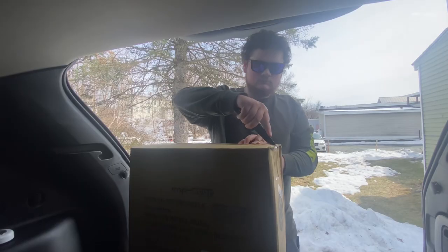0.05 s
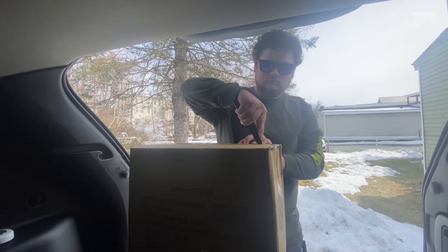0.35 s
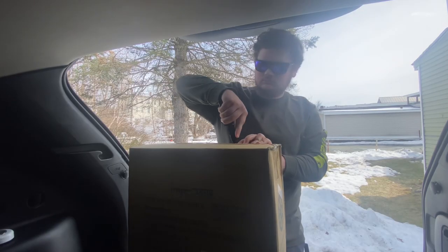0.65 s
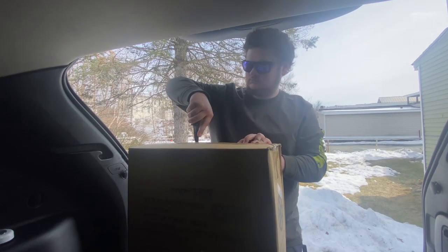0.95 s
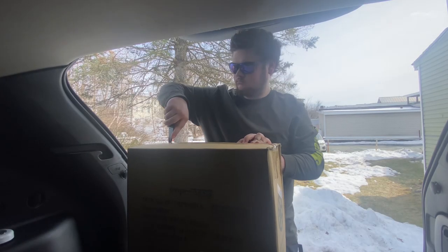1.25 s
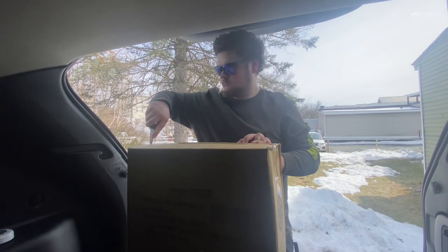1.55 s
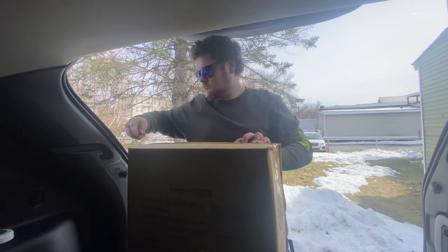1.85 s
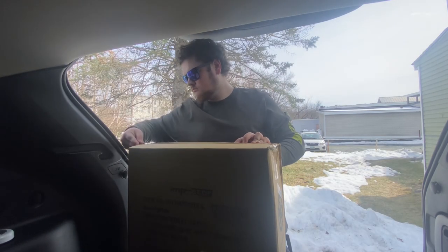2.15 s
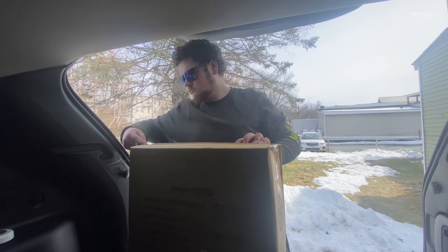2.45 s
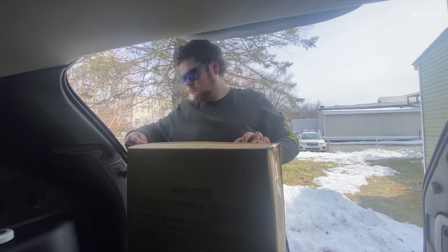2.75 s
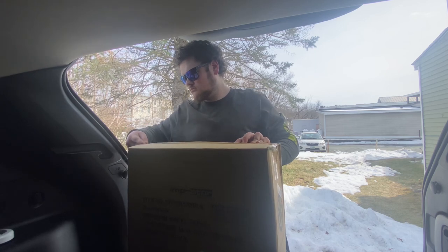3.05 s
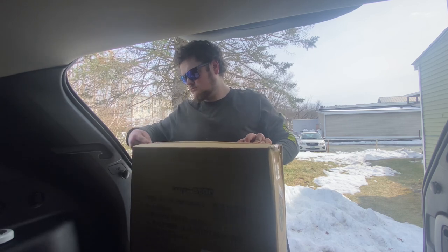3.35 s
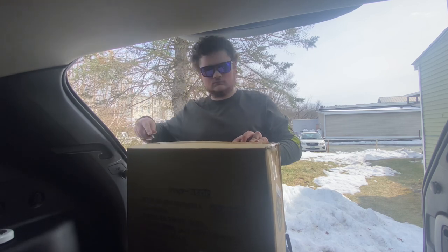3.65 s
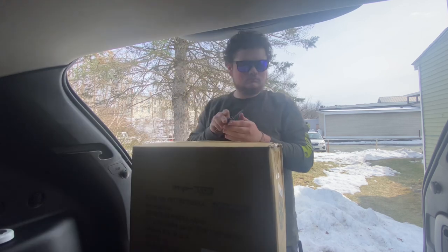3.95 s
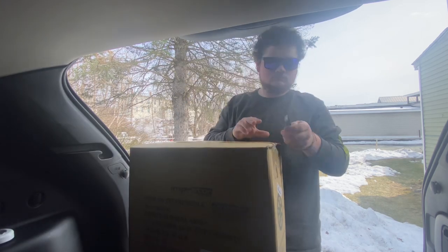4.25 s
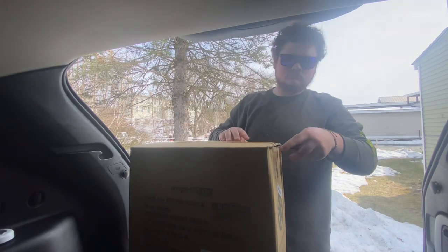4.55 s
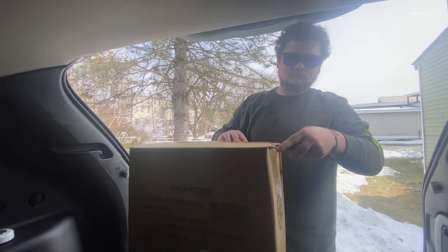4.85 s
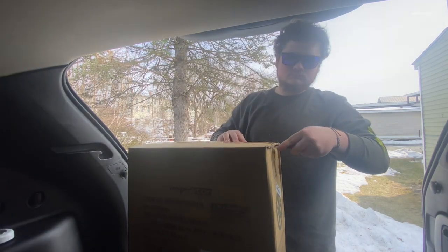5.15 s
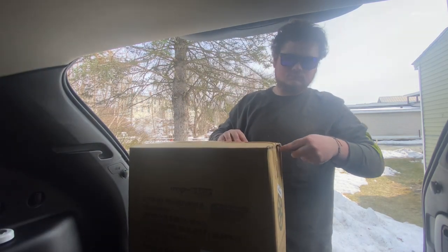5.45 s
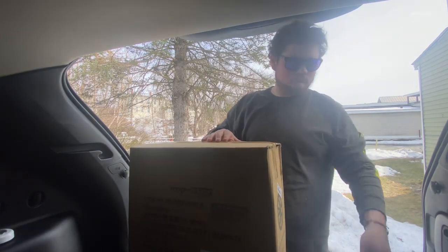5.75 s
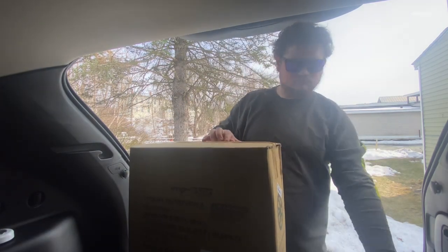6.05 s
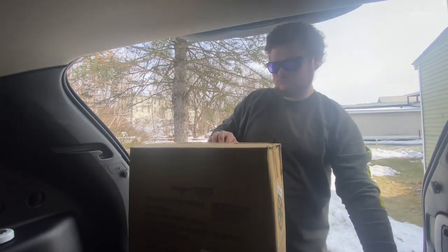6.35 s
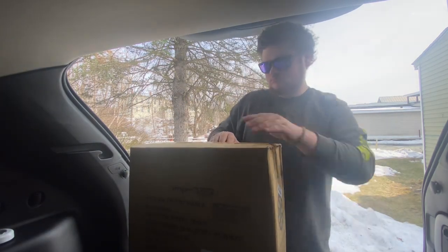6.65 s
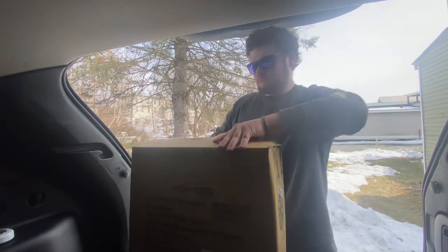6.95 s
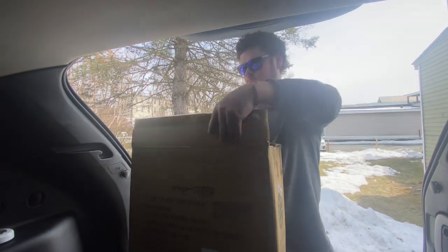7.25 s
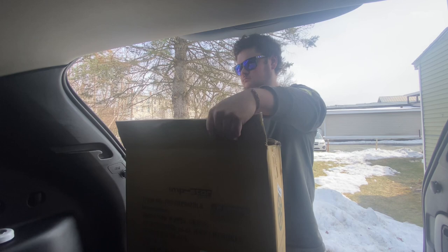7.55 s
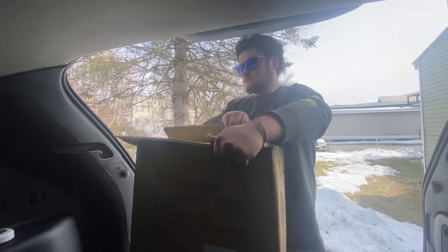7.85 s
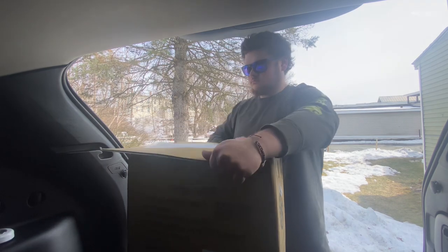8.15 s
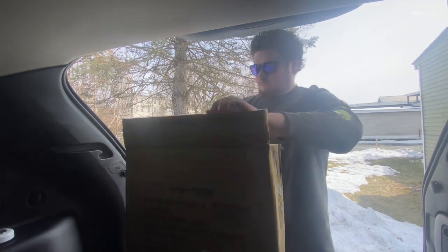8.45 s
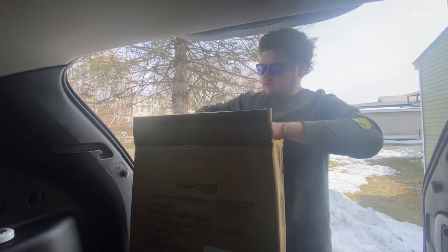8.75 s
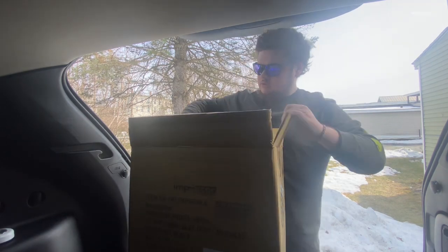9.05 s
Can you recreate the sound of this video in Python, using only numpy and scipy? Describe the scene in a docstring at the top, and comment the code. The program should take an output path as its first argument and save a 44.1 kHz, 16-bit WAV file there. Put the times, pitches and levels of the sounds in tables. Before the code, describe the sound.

A blade rasps through the tape of a large cardboard box in one long cut, then picks at it in short strokes. The seams pop one by one with papery cracks and hollow thumps. The flaps are pulled up, rubbing against each other, and one catches and judders. It is heard from inside a car's open boot, with a low outdoor rumble throughout and a faint distant whistle twice.

```python
"""A big cardboard box is opened at a car's tailgate, heard from inside the boot.
First a blade rasps through the top tape; then short strokes pick at it and the seams pop one by one.
From about 6.7 s the flaps are pulled up, rubbing on each other, and near 8 s one catches and judders.
Contacts crackle in the paper skin, knock in the stiff board and thump in the wide panels.
Outdoors rumbles low throughout, and twice a faint whistle carries from far off."""
import sys
import numpy as np
from scipy import signal
from scipy.fft import rfft, irfft, next_fast_len
from scipy.io import wavfile

SR = 44100
rng = np.random.default_rng(int(sys.argv[2]) if len(sys.argv) > 2 else 0)


def wav_record(signal):
    """Record a signal, one row per channel, as 16-bit PCM in the file named by sys.argv[1]."""
    frames = np.transpose(np.atleast_2d(signal))
    bounded = np.clip(frames, -1, 1)
    # unit amplitude maps onto the largest positive 16-bit level
    quanta = np.round(bounded * 32767).astype(np.int16)
    wavfile.write(sys.argv[1], SR, quanta)


N = 409688
TIME = np.arange(N) / SR
AGE = np.arange(SR // 3) / SR  # time axis of one hit
LEAD_S, TOUCH_S = .015, .025  # strain before a snap; fade as a contact lands or lifts

# the wide panels and the air inside the box: f/Hz, level/dB, t60/s
PANEL_MODES = [(66.9, 1.5, 0.38), (85, -2.5, 0.22), (117.7, -2.5, 0.12), (150.4, -6, 0.12), (202.2, 1, 0.1),
               (233.5, 0, 0.093), (316, -9.5, 0.025)]
# the stiff board: f/Hz, level/dB, t60/s
BOARD_MODES = [(328, -4, 0.022), (385.3, 4, 0.07), (430, -3, 0.025), (491, -2.5, 0.049), (617, -4.5, 0.054),
               (727, 0, 0.014), (870, 2, 0.019), (957, 2.5, 0.062), (1155, -1, 0.029), (1270, -17.5, 0.012),
               (1510, -6, 0.0083)]
# the steel blade: f/Hz, level/dB, t60/s
BLADE_MODES = [(2860, 2, 0.041), (3080, 0, 0.047), (3590, -9, 0.064), (5640, 11, 0.027)]


def seam_pops():
    """A seam bursts with a sharp blow and a twang of taut tape; the rest tears a moment later."""
    # t/s, crumble/s, crack/dB, crack tilt/(dB/octave), twang/dB, knock/dB, knock f/Hz, width/octaves,
    # ring over knock/dB, thump/dB, thump f/Hz, tear delay/s, tear over burst/dB
    bursts = [(0.299, 0.0025, -29.5, 6.5, -43, -25.5, 407, 0.81, -14, -24, 96, 0.022, -10),
              (2.359, 0.015, -31.5, 9.5, -37, -28, 340, 1, 1.5, -23.5, 205, 0.017, -3.5),
              (3.3825, 0.009, -34.5, 6.5, -38.5, -27, 825, 0.29, 1, -16, 223, 0.033, -3.5),
              (4.9331, 0.0077, -40.5, 5, -62, -37, 760, 0.47, -3, -24, 203, 0.029, -12),
              (5.093, 0.007, -27, 3.5, -42, -27, 400, 1, 1.5, -20.5, 155, 0.026, -16),
              (5.2348, 0.0067, -27, 2, -47, -33.5, 910, .7, -3, -24.5, 150, 0.016, -8),
              (6.431, 0.0057, -26, -0.5, -25.5, -28, 372, 0.87, 1.5, -24.5, 135, 0.0058, -20),
              (6.952, 0.0036, -25.5, 5, -31.5, -19.5, 576, 0.41, -1, -17, 166, 0.008, -16),
              (7.555, 0.012, -38, -3, -54, -35.5, 595, 0.64, 0, -33, 134.1, 0.027, -7),
              (8.476, 0.005, -38, 5, -43.5, -35, 760, 0.83, -4, -30.5, 96.1, 0.0065, -33)]
    # taut tape: f/Hz, level/dB, t60/s
    tape_modes = [(2470, -4, 0.021), (2766, 1.5, 0.033), (3550, -1.5, 0.017), (4770, -2, 0.017)]
    out = np.zeros((2, N))
    for (s, crumble_s, crack, tilt, twang, knock, knock_hz, octaves,
         ring, thump, thump_hz, delay_s, tear_db) in bursts:
        burst = blow(crumble_s, crack, tilt, knock, knock_hz, octaves, ring, thump, thump_hz)
        tape = ringing(flexed(tape_modes, spread=0.01))
        burst += cabin(strike(crumble(crumble_s, snap=0.75), tape, twang))
        tear = blow(crumble_s=0.0096, crack_db=crack + tear_db, tilt_db=0.7,
                    knock_db=knock + tear_db - 4, knock_hz=knock_hz, octaves=octaves, ring_db=ring,
                    thump_db=thump + tear_db, thump_hz=102)
        add(out, s - LEAD_S, burst)
        add(out, s + delay_s - LEAD_S, tear)
    return out


def tape_cutting():
    """The blade rasps through the top tape in one long cut; blade and hand also work it in strokes."""
    # paper skin under the tape: f/Hz, level/dB
    colour = [(1500, -5), (2000, 1), (2800, 5), (3600, -2), (5200, 6), (6500, 2.5), (8500, 0),
              (11000, -3.5), (13000, -6), (15500, -25)]
    # the long cut: t/s, rasp/dB, weight on the panels/dB, tilt/(dB/octave)
    long_cut = [(0.385, -54.5, 8, -6.5), (0.46, -53, 7.5, -5.5), (0.52, -56.5, 9, 1), (0.6, -56, 15, -2.5),
                (0.69, -53.5, 10, -3), (0.77, -52.5, 10, 7.5), (0.82, -51, 13.5, 5), (0.9, -53, 7, 4),
                (0.95, -47, 3, 0), (1.06, -53.5, 11, -3), (1.14, -54, 17, 0.5), (1.22, -52, 10, 6),
                (1.31, -50, 12, -2), (1.37, -54.5, 12.5, -2.5), (1.49, -47.5, 3, -0.5), (1.6, -54, 6, -3.5),
                (1.67, -48.5, 8, -5)]
    # short strokes: start/s, fullest/s, end/s, rasp/dB, weight/dB, tilt/(dB/octave)
    picks = [(0.27, 0.32, 0.39, -47, 11.5, -1.5), (1.68, 1.8, 2.1, -62, 8, -4),
             (2.16, 2.19, 2.23, -56, 17, -8), (2.24, 2.3, 2.44, -46, 11, -9.5),
             (2.355, 2.385, 2.44, -39.5, -3, 4.5), (2.43, 2.53, 2.71, -49.5, 8.5, -1),
             (2.66, 2.71, 2.93, -58.5, 10.5, -0.5), (3.3, 3.38, 3.56, -41.5, 10, -0.5),
             (3.68, 3.74, 3.83, -48.5, 0, 0), (3.8, 3.88, 3.99, -53.5, -25, 3.5),
             (4.19, 4.225, 4.275, -51, -12, 4), (4.85, 5.0, 5.1, -55, 17, -2.5),
             (4.915, 4.95, 5.0, -44.5, 17.5, 3), (5.04, 5.2, 5.39, -39, 9.5, 1.5),
             (5.46, 5.48, 5.55, -48, 5.5, 0), (5.58, 5.67, 5.74, -48, -16, 1), (5.7, 6.15, 6.5, -65, 9, -3),
             (5.93, 6.0, 6.05, -46.5, 0, -4), (6.26, 6.42, 6.52, -50, 0, -2)]
    blade = friction(snaps_per_s=2400, size_db=4.0, catch_db=3.5, smooth=0.38)
    tape = friction(snaps_per_s=1600, size_db=4.0, catch_db=3.5, smooth=0.61)
    cut = scrape(long_cut, blade, colour, rasp_db=5.0, board_db=2.5, panel_db=5.5, board_hz=520,
                 panel_hz=163, wander_hz=7.1, patchy_db=2.5, lurch_db=2.0, spots=6)
    return cut + strokes(picks, tape, colour, rasp_db=0.5, board_db=-0.5, panel_db=2.5)


def flap_rubbing():
    """Flap slides over flap as they are lifted, with firmer pushes on top."""
    # paper skin of the flaps: f/Hz, level/dB
    colour = [(1500, -8), (2000, 0), (2800, -1.5), (3600, -1), (5200, 5), (6500, 0.5), (8500, -2.5),
              (11000, -6.5), (13000, -8.5), (15500, -47)]
    # the unbroken slide: t/s, rasp/dB, weight on the panels/dB, tilt/(dB/octave)
    slide = [(6.67, -57, 10.5, -6.5), (6.76, -59.5, 7, -5.5), (7.0, -50, 6, -5.5), (7.3, -59, 8, -6),
             (7.42, -54, 4, -7.5), (7.73, -56, 10, -4), (8.2, -56, 7, -1.5), (8.47, -48, 1, -7),
             (8.5, -80, 9, 2), (8.58, -64.5, 5, -5), (8.63, -62, -4, 7), (8.87, -58, 3, -1),
             (9.29, -50.5, -1.5, 1.5)]
    # start/s, fullest/s, end/s, rasp/dB, weight/dB, tilt/(dB/octave)
    pushes = [(6.84, 6.935, 6.96, -48.5, 0, 2), (7.05, 7.085, 7.14, -39.5, -15, -1),
              (7.085, 7.105, 7.13, -30, -20, -4), (7.14, 7.21, 7.47, -52.5, -8, -4.5),
              (7.38, 7.46, 7.5, -43, 4, -3.5), (7.51, 7.56, 7.67, -39, 6, -1.5),
              (7.84, 7.89, 7.96, -47.5, 18, 0), (8.325, 8.385, 8.48, -38, -16, 1),
              (8.4, 8.43, 8.49, -42.5, 1, 1), (8.61, 8.68, 8.74, -47, 7, -0.5),
              (8.672, 8.69, 8.74, -34, -1, -2), (8.75, 8.785, 8.88, -46.5, 3, -1.5),
              (8.95, 8.98, 9.1, -56, 9, 9)]
    edges = friction(snaps_per_s=5000, size_db=2.0, catch_db=3.0, smooth=0.91)
    sliding = scrape(slide, edges, colour, rasp_db=1.0, board_db=-0.5, panel_db=4.5)
    return sliding + strokes(pushes, edges, colour, rasp_db=1.0, board_db=0.5, panel_db=-1.0)


def flap_judder():
    """A bending flap catches and slips; each slip taps the free flap and snaps in the crease."""
    # t/s, ring/dB, crease snap/dB
    slips = [(7.855, -38, -45), (7.861, -46, -47), (7.872, -43, -46), (7.880, -37, -38),
             (7.895, -34.5, -43.5), (7.906, -36, -50), (7.923, -38, -62), (7.949, -38.5, -57),
             (8.017, -47, -53), (8.051, -38, -64), (8.150, -41.5, -72), (8.199, -32.5, -53),
             (8.212, -31, -52), (8.230, -26.5, -48), (8.260, -35, -53), (8.275, -31.5, -53),
             (8.283, -38, -56), (8.306, -33, -67)]
    # the free flap: f/Hz, level/dB, t60/s
    flap_modes = [(233, -3.5, 0.07), (397, 5, 0.08), (532, 0.5, 0.058), (579.5, -2.5, .05),
                  (870, -5, 0.044), (923, -6.5, 0.03), (1143.5, -11.5, 0.036), (1480, -26, 0.046),
                  (1740, -23, 0.031), (1820, -13.5, 0.048), (2894, -18, 0.08)]
    slip_s = 0.0022
    crease = bending_wave(centre_hz=1680, octaves=1)
    out = np.zeros(N)
    for s, ring_db, snap_db in slips:
        flap = ringing(flexed(flap_modes, spread=0.014), travel_s=0.00139)
        sound = strike(crumble(slip_s, snap=2.2, grain_db=4.5), flap, ring_db)
        sound += strike(crumble(slip_s, snap=0.98), crease, snap_db + 0.5)
        add(out, s - LEAD_S, sound)
    return out


def box_bumps():
    """Blade, hand or flap bumps the box: a knock and a thump with only a little crack."""
    # t/s, knock/dB, knock f/Hz, thump/dB, thump f/Hz
    bumps = [(0.812, -61, 397, -35.5, 230), (1.045, -41, 1090, -32.5, 128), (1.267, -37, 910, -35, 190),
             (1.655, -44.5, 1520, -36, 129), (1.796, -52, 370, -39.5, 237), (1.913, -46.5, 816, -67, 130),
             (2.175, -50, 600, -48, 199), (2.577, -48.5, 764, -37, 130), (3.391, -57, 400, -18, 90),
             (3.757, -59, 701, -48, 200), (4.645, -43, 1050, -64, 133.3), (4.949, -41, 400, -28.5, 220),
             (5.157, -48, 500, -32, 150), (5.208, -47, 1000, -31, 150), (5.253, -35, 450, -20.5, 135),
             (5.354, -52, 1201, -46, 130), (6.393, -66, 400.7, -20.5, 130), (6.8, -57, 500, -38, 216),
             (6.84, -64, 500, -36, 130), (7.025, -49.5, 470, -43, 200), (7.812, -36.5, 563, -33.5, 200),
             (7.983, -44, 421, -29, 211), (8.715, -44, 1001, -65, 130), (8.964, -41.5, 650, -37, 165)]
    out = np.zeros((2, N))
    for s, knock, knock_hz, thump, thump_hz in bumps:
        bump = blow(crumble_s=0.006, crack_db=knock - 7.5, tilt_db=1, knock_db=knock, knock_hz=knock_hz,
                    octaves=0.61, ring_db=0, thump_db=thump, thump_hz=thump_hz)
        add(out, s - LEAD_S, bump)
    return out


def blade_ticks(patchy_db=3.5):
    """Light snaps of tape and blade barely move the board and faintly ring the steel."""
    # t/s, crumble/s, level/dB, tilt/(dB/octave)
    snaps = [(0.082, 0.0023, -40, 3.5), (0.839, 0.01, -40.5, 1), (0.924, 0.021, -36, 28),
             (2.334, 0.0023, -42, -4.5), (2.513, 0.0022, -42.5, -1.5), (2.556, 0.0032, -37.5, 4),
             (2.577, 0.0035, -41.5, 1), (2.692, 0.0013, -52.5, 3), (2.708, 0.0029, -46.5, 14.5),
             (2.725, 0.0015, -45.5, 7), (2.794, 0.0055, -55.5, -2), (2.861, 0.0024, -57, 4),
             (2.998, 0.0019, -52, 2.5), (3.047, 0.0032, -58.5, 3), (3.289, 0.0021, -47, 3),
             (3.323, 0.006, -39, 2.5), (3.452, 0.0026, -47, 3), (3.523, 0.0035, -53, -0.5),
             (3.641, 0.0087, -45.5, 1.5), (3.941, 0.0076, -57.5, 3), (4.125, 0.0034, -52.5, -0.5),
             (4.168, 0.0062, -47.5, -4.5), (4.963, 0.0013, -45, -0.5), (4.982, 0.0017, -46, 3),
             (5.043, 0.0012, -42, 1), (5.182, 0.0078, -32.5, 0.5), (5.19, .002, -39, 0),
             (5.266, 0.0084, -34.5, 0), (5.423, 0.0014, -51.5, -8), (5.672, 0.014, -47.5, -7.5),
             (6.007, 0.0056, -40.5, -5), (6.043, 0.0022, -51, -6.5), (6.279, 0.0049, -44, -0.5),
             (6.677, .003, -56.5, -4.5), (6.724, 0.0039, -52, -11), (6.779, 0.0027, -56, -2),
             (6.797, 0.0038, -49, -3.5), (7.189, .004, -61, -3), (7.284, .003, -60, -5),
             (7.338, .003, -56, 1), (7.465, 0.01, -40, -0.5), (8.591, 0.0016, -51, 6),
             (8.714, 0.0021, -43.5, 3), (8.905, 0.013, -47.5, 1.5)]
    # colour of a snap: f/Hz, level/dB
    colour = [(2000, -10), (2500, -11.5), (2900, 0.5), (3500, -6.5), (4200, -2.5), (5400, -0.5),
              (6500, -4.5), (8500, -9.5), (11000, -14), (15000, -30.5)]
    out = np.zeros(N)
    for s, crumble_s, db, tilt in snaps:
        force = crumble(crumble_s, snap=0.063)
        sound = strike(force, skin(patchy(colour, patchy_db), tilt, edge_hz=620), db)
        sound += strike(force, ringing(BOARD_MODES, centre_hz=1050), db - 12)
        sound += strike(force, ringing(flexed(BLADE_MODES, spread=0.022), travel_s=0), db - 27)
        add(out, s - LEAD_S, sound)
    return out


def blade_singing():
    """Drawn lightly along the tape, the blade rings in its own modes."""
    # start/s, end/s, level/dB
    rubs = [(3.641, 3.78, -63.5), (3.832, 3.89, -58.5)]
    out = np.zeros(N)
    for start, end, db in rubs:
        span = contact_span(start, end)
        force = touching(TIME[span], start, end) * rng.standard_normal(len(TIME[span]))
        steel = ringing(flexed(BLADE_MODES, spread=0.0082), travel_s=0)
        out[span] += from_db(db) * rms_one(through(force, steel))
    return out


def blow(crumble_s, crack_db, tilt_db, knock_db, knock_hz, octaves, ring_db, thump_db, thump_hz):
    """A blow cracks the skin, knocks the board and swings the panels, leaving both ringing."""
    # cracking paper skin: f/Hz, level/dB
    colour = [(1500, -1), (2000, -3), (2800, -1.5), (3600, -6), (5200, -0.5), (6500, -6), (8500, -10),
              (11000, -18), (13000, -18.5), (15500, -48)]
    snap = 0.0018 / crumble_s  # a quicker failure snaps harder
    board = ringing(BOARD_MODES, knock_hz, 1.5 * octaves, travel_s=0.00133)
    panels = ringing(PANEL_MODES, thump_hz, octaves=0.74, travel_s=0.001376)
    crack = strike(crumble(crumble_s, snap), skin(colour, tilt_db, edge_hz=1960), crack_db)
    knock = strike(crumble(crumble_s, 6 * snap), bending_wave(knock_hz, octaves), knock_db)
    ring = strike(crumble(crumble_s, 5 * snap, grain_db=1.5), board, knock_db + ring_db)
    swing = strike(crumble(crumble_s, 12 * snap), bending_wave(thump_hz, octaves=.45), thump_db - 6)
    boom = strike(crumble(crumble_s, 2.9 * snap, grain_db=1.0), panels, thump_db - 1.5)
    return cabin(crack + knock + ring + swing + boom, lowest_hz=570)


def crumble(decay_s, snap, grain_db=3.0, strain_s=0.027, strain_db=-22.0):
    """Force of one failure: a few fibres give, then a snap at LEAD_S and a dying shower of breaks."""
    onset = round(LEAD_S * SR)
    since = AGE - onset / SR
    fibres = rng.standard_normal(len(AGE))
    grains = np.repeat(rng.standard_normal(len(AGE)), 12)[:len(AGE)]
    strain = from_db(strain_db) * np.exp(-abs(since) / strain_s)
    shower = np.exp(-abs(since) / decay_s)
    force = fibres * from_db(grain_db * grains) * np.where(since < 0, strain, shower)
    force[onset] += snap * np.sqrt(np.sum(force ** 2))
    return force


def friction(snaps_per_s, size_db, catch_db, smooth):
    """Fibres snap at random, in clumps as the contact catches, over a smooth rub."""
    snaps = (rng.random(N) < snaps_per_s / SR) * rng.choice([-1, 1], N)
    sizes = from_db(size_db * np.minimum(rng.exponential(1, N), 4))
    rub = rms_one(snaps * sizes) + smooth * rng.standard_normal(N)
    return rms_one(rub * from_db(catch_db * drift(55.0)))


def strokes(rows, force, colour, rasp_db, board_db, panel_db, swell_db=8, ease_db=16.5):
    """Each stroke scrapes a fresh spot of the box, swells to its fullest and eases off."""
    out = np.zeros((2, N))
    for start, fullest, end, db, weight, tilt in rows:
        motion = [(start, db - swell_db, weight, tilt), (fullest, db, weight, tilt),
                  (end, db - ease_db, weight, tilt)]
        out += scrape(motion, force, colour, rasp_db, board_db, panel_db, tilt_spread=1.5, spots=2)
    return out


def scrape(motion, force, colour, rasp_db, board_db, panel_db, board_hz=570, panel_hz=122,
           wander_hz=4.6, tilt_spread=5.5, patchy_db=1.5, lurch_db=1.0, spots=3):
    """A lurching contact drives skin, board and panels as it wanders between dull and sharp spots."""
    s, *controls = np.transpose(motion)
    span = contact_span(s[0], s[-1])
    t = TIME[span]
    level, weight, brightness = [np.interp(t, s, control) for control in controls]
    board_lurch, panel_lurch = [lurch_db * drift(14.6, len(t)) for _ in range(2)]
    board_push = board_db + 0.37 * weight + board_lurch  # the stiff board feels only part of the weight
    panel_push = panel_db + weight + panel_lurch
    gains = [touching(t, s[0], s[-1]) * from_db(level + db) for db in (rasp_db, board_push, panel_push)]
    # equal-power crossfade that favours the spots nearest the present brightness
    tilts = brightness.mean() + np.linspace(-tilt_spread, tilt_spread, spots)
    shares = np.exp([drift(wander_hz, len(t)) - ((brightness - tilt) / tilt_spread) ** 2
                     for tilt in tilts])
    shares /= np.sqrt(np.sum(shares ** 2, axis=0))
    out = np.zeros((2, N))
    for share, tilt in zip(shares, tilts):
        fibres = np.roll(force, rng.integers(N))[span]
        paper = skin(patchy(colour, patchy_db), tilt)
        paths = paper, rubbed_board(board_hz), ringing(PANEL_MODES, panel_hz, octaves=1.0)
        sound = sum(gain * rms_one(through(fibres, path)) for path, gain in zip(paths, gains))
        out[:, span] += cabin(share * sound)
    return out


def skin(colour, tilt_db, edge_hz=1400, size=1024):
    """Response of the paper skin to one snapping fibre; it radiates little below its edge."""
    hz = np.arange(size // 2 + 1) * SR / size + 1
    gain = from_db(at_hz(colour, hz) + tilt_db * np.log2(hz / 5000)) / np.hypot(1, (edge_hz / hz) ** 5)
    # minimum phase keeps the attack sharp
    cepstrum = irfft(np.log(gain + 1e-3))
    cepstrum[1:size // 2] *= 2
    cepstrum[size // 2 + 1:] = 0
    return irfft(np.exp(rfft(cepstrum)))


def rubbed_board(centre_hz, t60_share=0.49):
    """The board under a sliding contact: a short, damped ring and a broad bending wave."""
    damped = [(hz, db, t60 * t60_share) for hz, db, t60 in flexed(BOARD_MODES)]
    ring = at_level(ringing(damped, centre_hz, octaves=1.0), db=0)
    return ring + at_level(bending_wave(centre_hz, octaves=0.92), db=1.5)


def bending_wave(centre_hz, octaves, delay_cycles=1.6):
    """The first wave across the cardboard: a pulse that sweeps down, as low notes travel slowly."""
    hz = np.arange(len(AGE) // 2 + 1) * SR / len(AGE) + 1
    dispersion = np.exp(-2j * np.pi * delay_cycles * np.log(hz))
    return irfft(bell(hz, centre_hz, octaves) * dispersion, len(AGE))


def ringing(modes, centre_hz=None, octaves=3.5, travel_s=0.00186):
    """Modes ring after a tap, low ones arriving later; a contact favours those near its centre."""
    out = 0
    for hz, db, t60 in modes:
        arrival_s = travel_s * np.sqrt(1000 / hz) * rng.uniform(.6, 1.2)
        age = np.maximum(AGE - arrival_s, 0)
        favour = bell(hz, centre_hz, octaves) if centre_hz else 1
        out += rng.choice([-1, 1]) * favour * from_db(db - 60 * age / t60) * np.sin(2 * np.pi * hz * age)
    return out


def flexed(modes, spread=0.055):
    """Pressing and bending a thing shifts each of its modes a little."""
    return [(hz * np.exp(spread * rng.standard_normal()), db, t60) for hz, db, t60 in modes]


def patchy(colour, spread_db):
    """Every spot of the box has a slightly different colour."""
    return [(hz, db + spread_db * rng.standard_normal()) for hz, db in colour]


def cabin(x, lowest_hz=420, trim_hz=5200, t60_s=0.035, wet_db=0.5):
    """Direct sound plus a brief wash of reflections off the windows; the trim soaks up their treble."""
    _, spectra = diffuse(len(AGE))
    wash = irfft(spectra, len(AGE)) * from_db(-60 * AGE / t60_s) * (AGE > .001)
    wash /= np.sqrt(np.sum(wash ** 2, axis=1, keepdims=True))
    wash = signal.sosfilt(signal.butter(2, [lowest_hz, trim_hz], "band", fs=SR, output="sos"), wash)
    wet = from_db(wet_db)
    return np.array([x + wet * through(x, side) for side in wash]) / np.hypot(1, wet)


def far_whistle(waver_db=4.5, bend=0.0072):
    """A few narrow, airy tones come and go in the distance, wavering in level and pitch."""
    # start/s, end/s, level/dB
    whistles = [(1.697, 2.27, -69.5), (4.282, 4.66, -71)]
    # the tones: f/Hz, level/dB, t60/s
    modes = [(2064, -1.5, .025), (3680, -7.5, .03), (5240, -8, .014)]
    gain = sum(from_db(db) * touching(TIME, start, end) for start, end, db in whistles)
    tones = rms_one(through(rng.standard_normal(N), ringing(modes, travel_s=0)))
    bent = np.interp(np.cumsum(1 + bend * drift(2.3)), np.arange(N), tones)
    return bent * gain * from_db(waver_db * drift(11))


def outdoors(level_db=-45.5, swell_db=1.0):
    """A low, slowly swelling rumble with a faint hiss."""
    # distant open air: f/Hz, level/dB
    colour = [(20, -42), (35, -0.5), (55, 4), (72, 1.5), (110, -9.5), (200, -16), (330, -23), (900, -24.5),
              (1500, -32), (2300, -38), (5000, -43.5), (8000, -56.5), (12000, -56), (16000, -91)]
    hz, spectra = diffuse(N)
    air = irfft(spectra * from_db(at_hz(colour, hz)), N)
    return rms_one(air) * from_db(level_db + swell_db * drift(0.077))


def diffuse(size):
    """Frequencies and stereo spectra of noise from all sides: nearly mono in the bass, wide above."""
    # sound the two microphones do not share: f/Hz, level/dB
    scatter = [(70, -36), (150, -15.5), (400, -5), (900, -3.5), (3500, -1.5), (5000, -2), (10000, -6.5)]
    hz = np.arange(size // 2 + 1) * SR / size
    apart = from_db(at_hz(scatter, hz))
    common, own = rfft(rng.standard_normal((2, size)))
    return hz, np.sqrt(1 - apart ** 2) * common + apart * own * [[1], [-1]]


def strike(force, response, db):
    """A force heard through one part of the box, at the given level."""
    return at_level(through(force, response), db)


def touching(t, start, end):
    """Gain that fades in softly at start and out at end."""
    return .5 + .5 * np.tanh(2 * np.minimum(t - start, end - t) / TOUCH_S)


def contact_span(start, end):
    """The samples of a contact, with room for its fades."""
    return slice(*np.searchsorted(TIME, [start - 2 * TOUCH_S, end + 2 * TOUCH_S]))


def drift(rate_hz, size=N):
    """Smooth random wandering with a spread of about 1."""
    pole = np.exp(-2 * np.pi * rate_hz / SR)
    return rms_one(signal.lfilter([1], [1, -2 * pole, pole * pole], rng.standard_normal(size + SR)))[SR:]


def bell(hz, centre_hz, octaves):
    """Bell-shaped gain around a centre frequency."""
    return np.exp(-.5 * (np.log2(hz / centre_hz) / octaves) ** 2)


def from_db(db):
    """Decibels to gain."""
    return 10 ** (np.asarray(db) / 20)


def rms_one(x):
    """Scale to rms 1."""
    return x / np.sqrt(np.mean(x ** 2) + 1e-20)


def at_level(x, db):
    """Give a short sound the energy of 30 ms at this level."""
    return x * from_db(db) * np.sqrt(.03 * SR / np.sum(x ** 2))


def at_hz(points, hz):
    """Read a table on a log-frequency axis."""
    known_hz, values = np.transpose(points)
    return np.interp(np.log(hz + 1), np.log(known_hz), values)


def through(x, response):
    """Pass a sound through an impulse response."""
    return signal.oaconvolve(x, response)[:len(x)]


def add(track, s, sound):
    """Mix a short sound in at time s."""
    part = track[..., round(s * SR):][..., :sound.shape[-1]]
    part += sound[..., :part.shape[-1]]


def scene():
    """The box is cut and unfolded at the open cabin, over the outdoor bed."""
    box = seam_pops() + tape_cutting() + flap_rubbing() + box_bumps()
    judder = cabin(flap_judder(), lowest_hz=680)
    blade = cabin(blade_ticks() + blade_singing())
    return box + judder + blade + far_whistle() + outdoors()


def record(dry, low_cut_hz=42, high_cut_hz=15900):
    """The two microphones differ in level and phase; deep bass and the top are cut."""
    # lead of the left microphone: f/Hz, phase/rad
    left_lead = [(0, 0), (950, .4), (2500, -.4), (3800, -.1), (4600, 2.6), (5400, .8), (6600, 2.8),
                 (7600, 3.2), (9700, 6.2), (11400, 6.4), (12600, 9.3), (16000, 12)]
    # left microphone over right: f/Hz, level/dB
    balance = [(100, 0.2), (300, -2.5), (700, 0.5), (1400, 2.5), (3000, -0.5), (6000, 0)]
    size = next_fast_len(N + SR)
    hz = np.arange(size // 2 + 1) * SR / size
    sides = np.array([[.5], [-.5]])
    phase = np.exp(1j * np.interp(hz, *np.transpose(left_lead)) * sides)
    gain = from_db(at_hz(balance, hz) * sides)
    pair = irfft(rfft(dry, size) * phase * gain, size)[:, :N]
    pair = signal.sosfilt(signal.butter(4, low_cut_hz, "high", fs=SR, output="sos"), pair)
    return signal.sosfilt(signal.ellip(10, .2, 80, high_cut_hz, fs=SR, output="sos"), pair)


dry = scene()
out = record(dry)
wav_record(out)
```